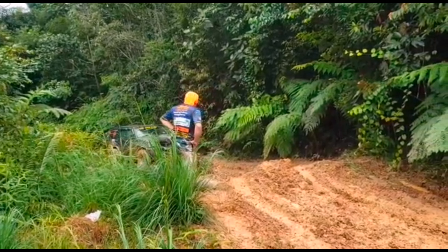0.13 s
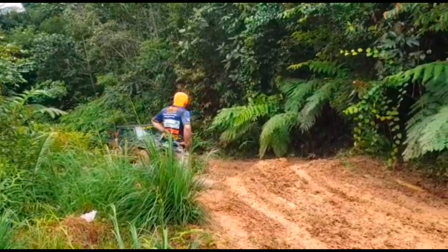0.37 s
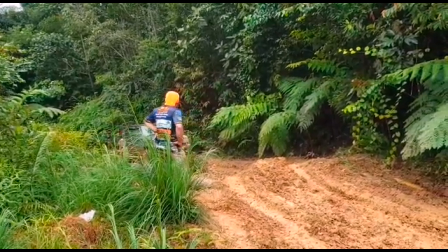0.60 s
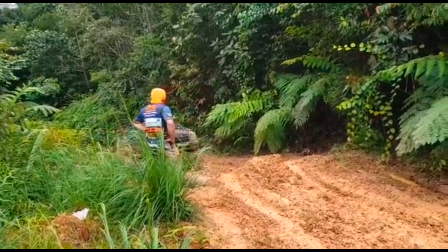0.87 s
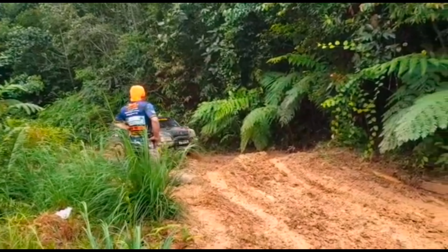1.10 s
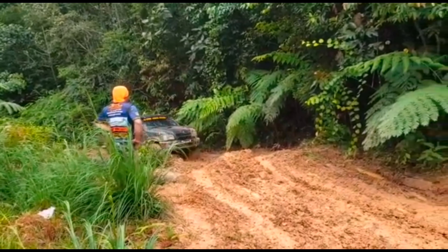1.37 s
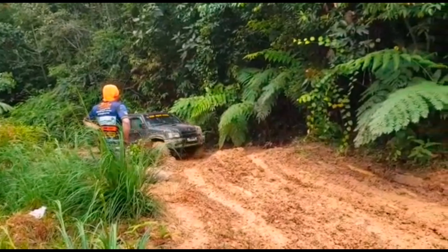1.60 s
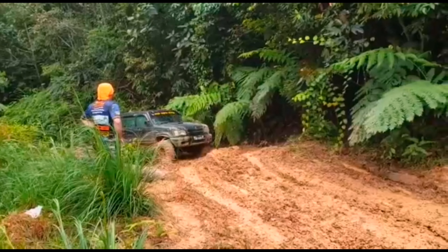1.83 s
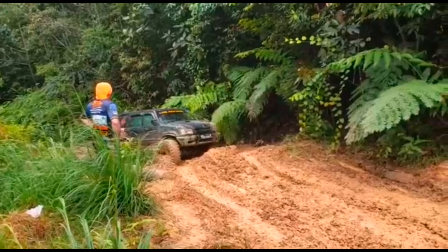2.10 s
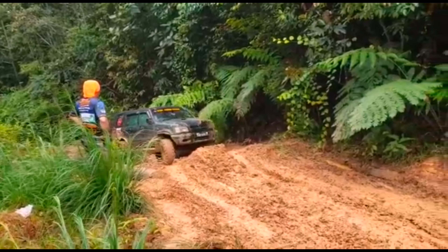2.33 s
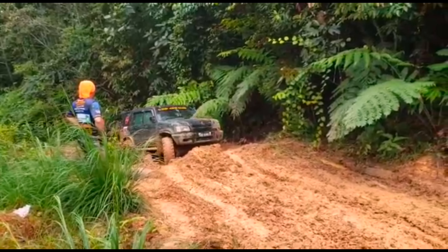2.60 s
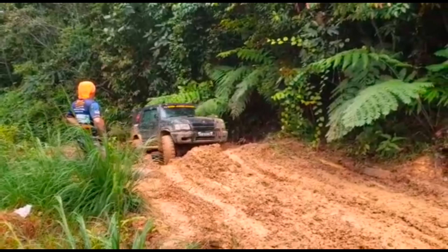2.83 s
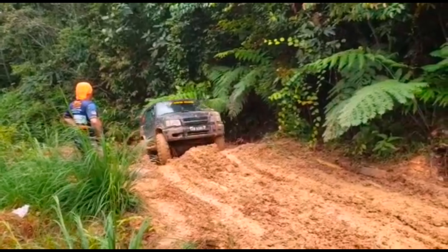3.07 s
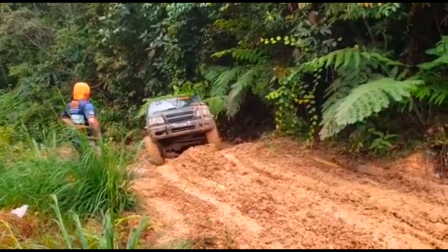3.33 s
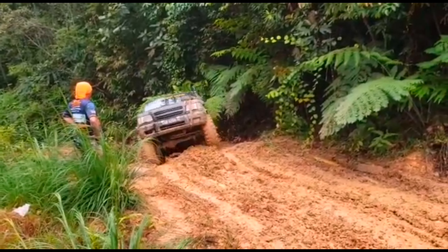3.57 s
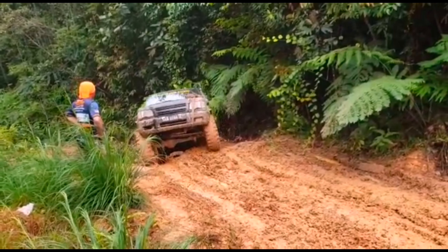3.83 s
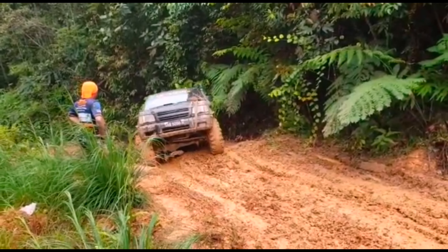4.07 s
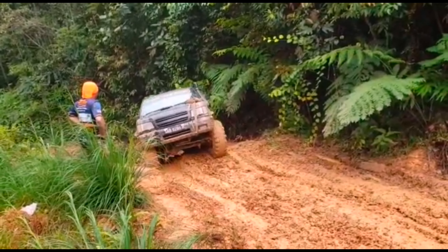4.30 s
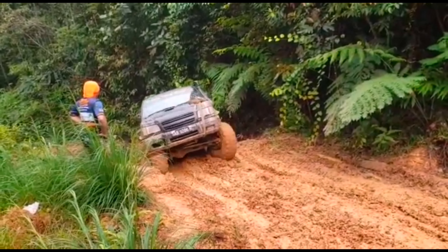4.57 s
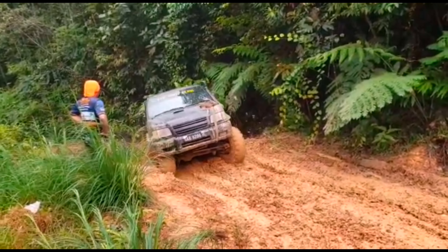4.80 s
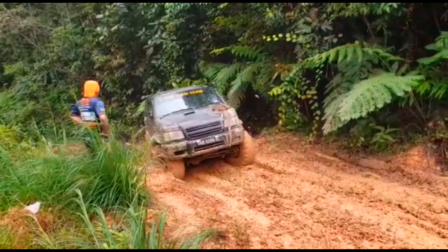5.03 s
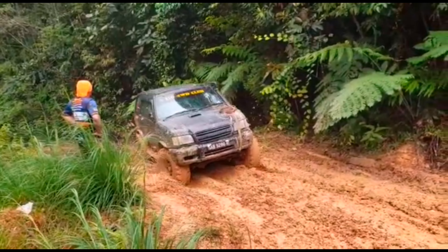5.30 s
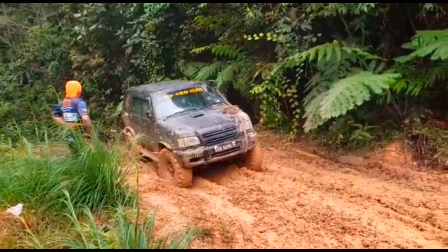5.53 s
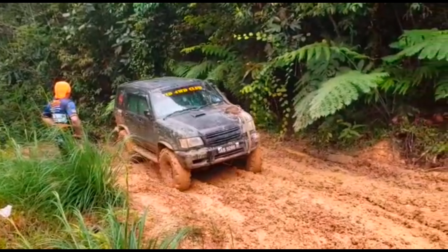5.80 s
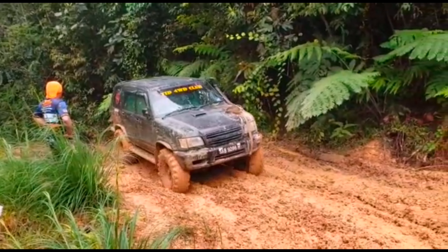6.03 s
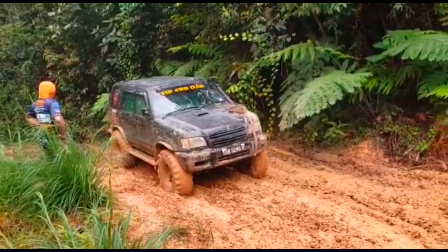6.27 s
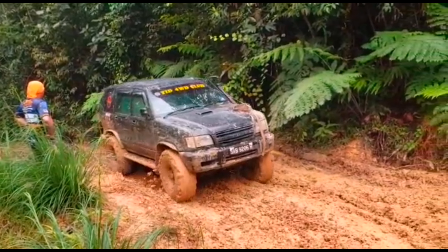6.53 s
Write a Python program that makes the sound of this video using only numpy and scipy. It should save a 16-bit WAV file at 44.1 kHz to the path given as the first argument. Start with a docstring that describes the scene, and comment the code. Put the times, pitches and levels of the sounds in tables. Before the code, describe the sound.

Outdoors among trees, a diesel off-roader approaches in uneven bursts of throttle: deep exhaust drone, gritty combustion knock, metallic clatter and airy hiss. An early surge fades, a distant engine hums briefly, then a long rising pull with one tiny bodywork scrape. A wheel-spinning peak collapses into a short lull before a low, chugging growl. Stereo pickup, fairly close, lightly reflected, no voices.

```python
"""A four-cylinder diesel off-roader climbs a muddy forest track towards the listener in surges of throttle.
Its exhaust is a sum of multiples of the firing rate; each firing also gates bands of noise as knock
through block and bodywork and sets panels ringing. Intake and fan hiss, tyres and frame rumble.
A second engine revs briefly further off, and something scrapes the bodywork once.
Two close microphone ports, with echoes off bank and trunks around."""
import sys
import numpy as np
from scipy import signal
from scipy.fft import rfft, irfft, next_fast_len
from scipy.io import wavfile
from scipy.ndimage import uniform_filter1d

SR = 44100
rng = np.random.default_rng(int(sys.argv[2]) if len(sys.argv) > 2 else 0)


def log_audio(samples):
    """Write samples as a 16-bit WAV file to the path given in sys.argv[1]."""
    # one column per channel
    frames = np.atleast_2d(samples).T
    # limit to full scale, then quantise
    limited = np.clip(frames, -1, 1)
    pcm = np.round(limited * 32767).astype(np.int16)
    wavfile.write(sys.argv[1], SR, pcm)


def gain_from_db(level_db):
    """Convert decibel levels to linear amplitude factors (20 dB per decade)."""
    decades = np.asarray(level_db, float) / 20
    return 10 ** decades


N = 293265
TIME_S = np.arange(N) / SR
MIDWAY_S = 3.3  # the approach is reckoned from here
PULLING_DB = -18  # pulse strength at full load

# Throttle as heard in the exhaust. Each row: time in seconds, pulse strength in dB,
# pulse sharpness in dB per order.
EXHAUST = [(0.0, -24.8, -0.2), (0.3, -16, 0), (1.0, -26.3, -1), (1.1, -24, -2.6), (1.18, -27, -1),
           (1.25, -36.5, 0.7), (1.6, -28.5, -2), (1.7, -29, -4.5), (1.9, -25, -6), (2.1, -24, -6),
           (2.15, -15.5, -3), (2.24, -17.5, -1.5), (2.5, -16, -2), (2.8, -16.5, -1.8), (3.1, -20, -1.9),
           (3.5, -18, -2), (3.6, -21.5, -1.5), (3.75, -42.5, 7), (3.8, -32, -4), (3.95, -32, 1),
           (4.15, -34, 1), (4.2, -19, 1.0), (4.3, -15.5, -2.5), (4.45, -14, -1), (4.6, -12.5, -2),
           (4.72, -16, -1.5), (4.9, -19.0, -0.3), (5.1, -18, -1), (5.2, -23.5, -4.5), (5.27, -28, 0.5),
           (5.33, -41.5, -11), (5.43, -50, -19.5), (5.55, -32.5, -2), (5.7, -16.5, -4.8),
           (6.1, -12.5, -2.5), (6.33, -13, -4), (6.45, -17, -3), (6.5, -13, -3.5), (6.65, -16.5, -3)]
# Lean of the sound between the ports. Each row: frequency in Hz, left minus right in dB.
LEANING = [(60, -2), (110, 2), (200, 2), (380, 1.5), (700, 1.5), (1290, 5), (2380, 1.5), (4400, -2.5),
           (8120, 0.0), (15000, -8)]
# How a noise follows the engine: level in dB at usual effort and speed, share of the effort swing (ratio),
# dB per octave of speed, dB per second of approach, share of brightness (ratio), share of pulse swing (ratio).
ROAR_LAW = (-42.5, 0.5, 2.5, 1.22, -.8, .08)


def in_time(rows):
    """Columns of a table after the time column, one value per sample."""
    s, *columns = np.transpose(rows)
    return [np.interp(TIME_S, s, c) for c in columns]


def at_hz(points, hz):
    """A spectrum read on a log-frequency axis, holding its end values beyond its ends."""
    f, v = np.transpose(points)
    return np.interp(np.log(hz), np.log(np.maximum(f, 1)), v)


def lean_gain(hz):
    """Left and right gain of a sound at this frequency."""
    return gain_from_db(at_hz(LEANING, hz) / 2 * np.array([[1], [-1]]))


def drift(rate_hz):
    """Slow random wander of spread 1: low-passed noise."""
    steps_per_s = 200
    steps = rng.standard_normal(int(N / SR * steps_per_s) + 2)
    r = np.exp(-2 * np.pi * rate_hz / steps_per_s)
    slow = signal.lfilter([1], [1, -r], steps)
    return np.interp(TIME_S * steps_per_s, np.arange(len(slow)), slow / slow.std())


def coloured(spectrum, gate, per_octave, patchy_db):
    """Gated stereo noise through a bank of band-passes whose levels wander separately; overall rms 1."""
    # Likeness of the two ports. Each row: frequency in Hz, left-right likeness 0-1.
    likeness = [(60, .97), (300, .95), (700, .9), (1400, .62), (3000, .55), (7000, .35), (15000, .25)]
    low, high = spectrum[0][0], spectrum[-1][0]
    edges = np.geomspace(low, high, int(per_octave * np.log2(high / low)) + 2)
    white = rng.standard_normal((2, 2, N)) * gate
    out = 0
    for k, band in enumerate(zip(edges, edges[1:])):
        band_pass = signal.butter(2, band, "band", fs=SR, output="sos")
        mid, side = signal.sosfilt(band_pass, white[k % 2])  # neighbouring bands use separate noise
        hz = np.sqrt(band[0] * band[1])
        alike = np.clip(at_hz(likeness, hz), 0, 1)
        gain = gain_from_db(at_hz(spectrum, hz) + patchy_db * drift(5.5))
        stereo = np.sqrt(1 + alike) * mid + np.sqrt(1 - alike) * side * [[1], [-1]]
        out = out + gain * lean_gain(hz) * stereo
    return out / out.std()


def load():
    """Engine load 0-1, from the strength of the exhaust pulses."""
    coasting_db = -28
    return np.clip((in_time(EXHAUST)[0] - coasting_db) / (PULLING_DB - coasting_db), 0, 1)


def order_levels(per_s):
    """Level of orders 1-5: pulse strength and sharpness, coloured by the silencer at each order's pitch."""
    # What the exhaust system lets through. Each row: frequency in Hz, gain in dB.
    silencer = [(38, -20), (50, -13), (62, -2.5), (80, -5.5), (100, -5.5), (120, -0.5), (145, 0.25),
                (165, -1.5), (190, -5.5), (215, -8.6), (245, -15.5), (290, -26), (350, -23.5), (400, -20.2),
                (450, -22.5), (560, -60)]
    steepen = 0.25  # strong pulses steepen: extra dB per dB of strength, per order above the third
    upper_hz, upper_nearing_db = 324, 7  # orders above this pitch grow on approach (dB per s per octave)
    pulse_db, sharp_db = in_time(EXHAUST)
    nearing_db = upper_nearing_db * (TIME_S - MIDWAY_S)
    levels = []
    for k in range(1, 6):
        order_db = pulse_db + sharp_db * (k - 2)
        steep_db = steepen * max(k - 3, 0) * (pulse_db - PULLING_DB)
        upper_db = nearing_db * np.maximum(np.log2(k * per_s / upper_hz), 0)
        levels.append(order_db + steep_db + at_hz(silencer, k * per_s) + upper_db)
    return levels


def orders(turns, levels_db):
    """Clean multiples of the firing rate, in step like a pressure pulse."""
    return sum(np.sqrt(2) * gain_from_db(db) * np.cos(2 * np.pi * (k + 1) * turns) for k, db in enumerate(levels_db))


def muffler(x):
    """The silencer spreads each pulse in time: an all-pass around its chamber resonance."""
    chamber_hz, width_hz = 46, 33
    r, c = np.exp(-np.pi * width_hz / SR), np.cos(2 * np.pi * chamber_hz / SR)
    return signal.lfilter([r * r, -2 * r * c, 1], [1, -2 * r * c, r * r], x)


def exhaust(turns, levels_db):
    """Each firing is a little stronger or weaker, by cylinder and by chance; the pulses arrive as suction."""
    # Strength of each cylinder in turn, in dB per dB of unevenness.
    cylinders_db = [-0.31, 0.41, 0.34, 0.48]
    # Cylinder unevenness, rising while the wheels spin. Each row: time in seconds, unevenness in dB.
    uneven = [(0, .55), (3.6, .75), (4.5, 2.2), (5.1, 2.2), (5.5, .75), (6.65, .6)]
    uneven_db, = in_time(uneven)
    firing = np.arange(int(turns[-1]) + 2)
    strength = np.take(cylinders_db, firing % 4)
    by_cylinder = uneven_db * np.interp(turns, firing, strength)
    by_chance = 0.68 * np.interp(turns, firing, rng.standard_normal(len(firing)))
    # timing shifts in firing intervals: strong pulses outrun weak ones, and chance scatter
    sooner = 0.016 * uneven_db * np.interp(turns - 0.5, firing, strength)
    scatter = 0.013 * uneven_db * np.interp(turns, firing, rng.standard_normal(len(firing)))
    return muffler(-orders(turns + sooner + scatter, levels_db) * gain_from_db(by_cylinder + by_chance))


def knock_sizes(knock, spread_db):
    """Strength of each firing's knock: chance, and some firings of set strength, most of them harder."""
    # Knocks of set strength. Each row: time in seconds, level in dB over a usual knock.
    hard_knocks = [(1.894, 4), (2.2, 3), (2.254, 2.5), (2.318, 3.5), (2.46, -1), (4.6, 1), (5.683, -0.5),
                   (5.786, 2.5), (5.833, 1), (5.878, 4.5), (5.942, 1), (6.006, 1), (6.13, 3), (6.248, 0),
                   (6.602, 1)]
    size_db = spread_db * rng.standard_normal(int(knock[-1]) + 2)
    for s, db in hard_knocks:
        size_db[int(knock[int(s * SR)])] = db
    return gain_from_db(size_db)[knock.astype(int)]


def knock_share(per_s):
    """Knock stands out at low speed and under load."""
    # Relative share of the noise that comes as knock at full load. Each row: firings per second, share 0-1.
    full_load = [(45, .85), (60, .82), (70, .62), (80, .48), (90, .2), (110, .2)]
    coasting_share = 0.45  # part of it left without load
    return np.interp(per_s, *np.transpose(full_load)) * (coasting_share + (1 - coasting_share) * load())


def bursts(knock, size, per_s, share, rise_s, decay_s):
    """Envelope of combustion knock: a quick rise at each firing, then a short fade, over a steady part."""
    since = knock % 1 / per_s
    shape = (1 - np.exp(-since / rise_s)) * np.exp(-since / decay_s)
    shape /= np.sqrt(uniform_filter1d(shape ** 2, size=SR // 5))
    share = np.clip(share, 0, 1)
    return np.sqrt(1 - share + share * (size * shape) ** 2)


def noise_level(law, per_s):
    """Level in dB of one noise layer from effort, speed, approach, brightness and throttle."""
    # Effort of the engine. Each row: time in seconds, mechanical noise in dB, brightness in dB
    # as the nose turns to or from the listener.
    effort = [(0, -46.5, -0.5), (.2, -37.5, 0), (.45, -39.5, 0), (.7, -40.5, 1), (1.0, -44.5, -0.5),
              (1.31, -48, -1), (1.7, -48.5, -1.5), (2.07, -47, -4.5), (2.24, -39.5, -2), (2.5, -39, 0.5),
              (2.8, -41.5, .5), (3.06, -38.5, .5), (3.39, -42.5, -.5), (3.59, -39.5, 0), (3.76, -44, -.5),
              (4.09, -43.5, -2), (4.39, -35.5, -1), (4.65, -37, -1), (5.13, -41, -.5), (5.54, -49, 1),
              (5.65, -46.5, -1), (5.78, -40.5, -1.5), (6.12, -37, 1), (6.44, -41, -1), (6.65, -37, 1.5)]
    usual_db, usual_per_s = -42, 70
    effort_db, bright_db = in_time(effort)
    db, follows, octave_db, nearing_db, bright, pulsed = law
    engine_db = follows * (effort_db - usual_db) + octave_db * np.log2(per_s / usual_per_s)
    place_db = bright * bright_db + nearing_db * (TIME_S - MIDWAY_S)
    return db + engine_db + place_db + pulsed * (in_time(EXHAUST)[0] - PULLING_DB)


def boom(per_s, soft):
    """Low, hollow knock noise whose bands wander widely under the soft firing envelope."""
    # Each row: frequency in Hz, relative level in dB per Hz.
    spectrum = [(280, -15.5), (340, -5), (390, 2.5), (450, -5.5)]
    # Columns and units as in ROAR_LAW.
    law = (-45.5, 1.54, 4, 1.8, -1.2, -0.17)
    return gain_from_db(noise_level(law, per_s)) * coloured(spectrum, soft, per_octave=5, patchy_db=5.0)


def roar(per_s, soft):
    """Low-mid knock noise, pulsing softly with the firings."""
    # Each row: frequency in Hz, relative level in dB per Hz.
    spectrum = [(460, -4.5), (550, -3.5), (620, -3), (690, -8)]
    return gain_from_db(noise_level(ROAR_LAW, per_s)) * coloured(spectrum, soft, per_octave=5, patchy_db=1.5)


def rasp(per_s, soft):
    """Rough mid-range knock noise, pulsing softly with the firings."""
    # Each row: frequency in Hz, relative level in dB per Hz.
    spectrum = [(720, -2), (850, -0.5), (960, -1.5), (1150, -4), (1280, -9), (1550, -3)]
    # Columns and units as in ROAR_LAW.
    law = (-41.5, 0.97, 1.6, .66, -.8, -0.09)
    return gain_from_db(noise_level(law, per_s)) * coloured(spectrum, soft, per_octave=6, patchy_db=1.5)


def clatter(per_s, sharp):
    """Hard upper-mid knock noise under the sharp firing envelope."""
    # Each row: frequency in Hz, relative level in dB per Hz.
    spectrum = [(1500, -10), (1900, -1.5), (2500, -1), (3100, -2.5), (3600, -6), (4300, -4.5)]
    # Columns and units as in ROAR_LAW.
    law = (-40, 0.81, 0.2, -0.08, 0, 0.0657)
    return gain_from_db(noise_level(law, per_s)) * coloured(spectrum, sharp, per_octave=4, patchy_db=1.5)


def ticking(per_s, sharp):
    """Treble ticks at the firings over a steady bed of noise."""
    # Each row: frequency in Hz, relative level in dB per Hz.
    spectrum = [(4200, -6), (5000, -7.5), (6300, -5.5), (7200, -10), (8800, -16.5)]
    # Columns and units as in ROAR_LAW.
    law = (-42.5, 0.73, 1.7, 0.04, .8, 0.18)
    gate = 0.34 + 0.58 * sharp
    return gain_from_db(noise_level(law, per_s)) * coloured(spectrum, gate, per_octave=4, patchy_db=1.23)


def boost(per_s):
    """The turbocharger spools up under load: extra intake hiss (dB), lagging behind load and speed."""
    from_per_s, lag_s, octave_db = 71, 0.15, 15  # dB per octave of speed at full load
    r = np.exp(-1 / (lag_s * SR))
    spooling = load() * np.maximum(np.log2(per_s / from_per_s), 0)
    return octave_db * signal.lfilter([1 - r], [1, -r], spooling)


def hiss(per_s, sharp):
    """Air noise of intake and fan, partly pulsed by the firings and raised by the boost."""
    # Each row: frequency in Hz, relative level in dB per Hz.
    spectrum = [(8300, -25), (9400, 0.5), (10500, 3), (11900, 6), (13300, 0), (15700, -6)]
    # Columns and units as in ROAR_LAW.
    law = (-49.5, 0.37, 3.5, 0.84, .6, 0)
    gate = 0.5 + 0.45 * sharp
    level_db = noise_level(law, per_s) + boost(per_s)
    return gain_from_db(level_db) * coloured(spectrum, gate, per_octave=6, patchy_db=1.0)


def rumble(per_s):
    """Tyres, frame and ground: ungated low noise that follows half the roar's level in dB."""
    # Each row: frequency in Hz, relative level in dB per Hz.
    spectrum = [(38, 3), (70, 7.5), (150, 11.5), (230, 4.5), (300, -17)]
    level_db = 0.5 * noise_level(ROAR_LAW, per_s) - 15.5
    return gain_from_db(level_db) * coloured(spectrum, 1, per_octave=1.5, patchy_db=5.0)


def panels(knock, size, per_s, spread_db):
    """Every firing shakes each mode briefly, with a strength of its own on either side; rms 1."""
    # Panels and pipes that ring. Each row: frequency in Hz, relative level in dB, 60 dB decay time in seconds,
    # dB per second as the vehicle turns its front to the listener.
    modes = [(394.3, -1, 0.05, 1.4), (536, 0.5, 0.045, -1.7), (825, 6, 0.033, 2.8), (897, -2, 0.038, 4.7),
             (1267, -6.5, 0.061, 0.7), (1870, -22, 0.057, 6), (2153, -16, 0.033, -2),
             (2460, -9, .025, -2.5), (2930, -12, 0.023, -6)]
    buzz_per_s, buzz_width_per_s = 62, 6.0  # thin panels buzz near one engine speed, under load
    buzz_db, buzz_above_hz = 13.0, 2000
    strike_s = 0.0025  # time constant of the shake
    hits = np.flatnonzero(np.diff(knock.astype(int))) + 1
    near_speed = np.exp(-((per_s[hits] - buzz_per_s) / buzz_width_per_s) ** 2)
    loaded_buzz_db = buzz_db * near_speed * load()[hits]
    hold, out = np.exp(-1 / (strike_s * SR)), np.zeros((2, N))
    for hz, db, t60, turning_db in modes:
        shared, left, right = rng.standard_normal((len(hits), 3)).T
        mode_db = db + turning_db * (hits / SR - MIDWAY_S) + loaded_buzz_db * (hz > buzz_above_hz)
        chance_db = spread_db * (shared + 0.44 * np.array([left, right]))
        clicks = np.full((2, N), 1e-18)
        clicks[:, hits] = size[hits] * gain_from_db(mode_db + chance_db)
        shake = signal.lfilter([1], [1, -2 * hold, hold ** 2], clicks) * rng.standard_normal(N)
        r, w = gain_from_db(-60 / (t60 * SR)), 2 * np.pi * hz / SR
        out += lean_gain(hz) * signal.lfilter([1, 0, -1], [1, -2 * r * np.cos(w), r * r], shake)
    return out / out.std()


def ringing(knock, size, per_s):
    """Ringing panels and pipes at a level that follows effort, speed and throttle."""
    # Columns and units as in ROAR_LAW.
    law = (-41.5, 0.54, 1.8, -0.78, -1.2, 1)
    return gain_from_db(noise_level(law, per_s)) * panels(knock, size, per_s, spread_db=1.0)


def tailpipe(x):
    """Sound runs to and fro in the pipe: resonances at multiples of its pitch, fading in the treble."""
    # The tailpipe swings out of sight. Each row: time in seconds, share heard through the pipe 0-1.
    pipe_heard = [(0, 0.36), (3.2, 0.97), (4.6, 0.4), (6.65, .3)]
    pipe_hz, pipe_return, fade_hz = 428, 0.4, 3500
    size = next_fast_len(N + SR // 10)
    hz = np.arange(size // 2 + 1) * SR / size
    back = pipe_return / (1 + (hz / fade_hz) ** 4) * np.exp(-2j * np.pi * hz / pipe_hz)
    response = np.sqrt(1 - abs(back) ** 2) / (1 - back)
    resonant = irfft(rfft(x, size) * response, size)[:, :N]
    heard = np.clip(in_time(pipe_heard)[0], 0, 1)
    return heard * resonant + (1 - heard) * x


def ground_dip(x):
    """The echo off the track cancels a band, by a depth that varies along the climb."""
    # Each row: time in seconds, depth of the dip 0-1.
    dip = [(0, 0.7), (1.5, 0.25), (2.2, 1), (2.7, 0.5), (3.3, 0), (5.3, 0.12), (6.0, 0.7), (6.65, 0)]
    dip_hz, width_hz = 675, 150
    depth, = in_time(dip)
    r, c = np.exp(-np.pi * width_hz / SR), np.cos(2 * np.pi * dip_hz / SR)
    band = signal.lfilter((1 - r * r) / 2 * np.array([1, 0, -1]), [1, -2 * r * c, r * r], x)
    return x - np.clip(depth, 0, 1) * band


def trees(x, db):
    """A few dull echoes off bank and trunks, other ones on each side, weaker the later they come."""
    dull = signal.lfilter([0.15], [1, -0.85], x)
    out = np.zeros((2, N))
    lags = (rng.uniform(0.0083, 0.083, 8) * SR).astype(int)
    for k, lag in enumerate(lags):
        out[k % 2, lag:] += gain_from_db(db - 60 * lag / SR) * dull[:-lag]
    return out


def far_engine():
    """Another exhaust further off, heard only by its lowest orders, its level wandering."""
    # Second engine. Each row: time in seconds, firings per second, level in dB.
    revs = [(0.7, 31.5, -64), (0.9, 35.5, -44), (1.1, 35.2, -41), (1.3, 41, -38), (1.5, 43.5, -29.5),
            (1.62, 46.3, -39.5), (1.73, 44, -35), (1.85, 40, -61), (2.0, 26, -60), (2.15, 42, -53)]
    # Relative level of orders 1-5, in dB.
    orders_db = [-11, -0.5, 2.5, -17, -21]
    per_s, db = in_time(revs)
    heard = (TIME_S > revs[0][0]) & (TIME_S < revs[-1][0])
    return heard * gain_from_db(db + 1.7 * drift(6.5)) * orders(np.cumsum(per_s) / SR, orders_db)


def bite():
    """The noise sinks just before the throttle bites, then jolts and settles (dB)."""
    # Times when the throttle bites, in seconds.
    bites_s = [2.13, 5.67]
    lull_db, lull_s = -2.0, 0.05
    jolt_db, fade_s = 3.0, 0.05
    since = TIME_S - np.array(bites_s)[:, None]
    lull = lull_db * np.exp(-abs(since) / lull_s)
    jolt = jolt_db * np.exp(-abs(since) / fade_s)
    return np.where(since < 0, lull, jolt).sum(axis=0)


def scrape(jolts):
    """Something drags briefly along the bodywork: a short bright rasp, jolted by the firings."""
    peak_s, peak_db = 3.085, -33
    rise_db_per_s, fall_db_per_s = 170, 170
    since = TIME_S - peak_s
    db = peak_db - np.maximum(-rise_db_per_s * since, fall_db_per_s * since)
    spectrum = [(2900, -1), (3400, 0), (4300, -4)]  # Hz, relative dB per Hz
    return gain_from_db(db) * coloured(spectrum, jolts, per_octave=3, patchy_db=0.5)


def scene():
    """Exhaust, knock and hiss of the climbing vehicle with the far engine."""
    # Engine speed. Each row: time in seconds, firings per second.
    speed = [(0.0, 63.87), (0.3, 70.16), (0.75, 83.06), (0.89, 78.93), (1.09, 75.3), (1.31, 63.94),
             (1.8, 57.08), (2.05, 54.52), (2.18, 56.94), (2.5, 66.17), (2.56, 65.94), (2.85, 69.84),
             (3.41, 82.05), (3.62, 88.76), (3.8, 82.72), (4.11, 88.12), (4.22, 95.12), (4.42, 113.94),
             (4.7, 92.84), (5.11, 84.04), (5.2, 81.34), (5.59, 37.13), (5.95, 46.76), (6.1, 49.71),
             (6.45, 49.73), (6.65, 53.77)]
    per_s, = in_time(speed)
    turns = 0.27 + np.cumsum(per_s) / SR  # firing intervals gone
    knock = turns + 0.2  # knock leads the exhaust pulse by this part of an interval
    size = knock_sizes(knock, spread_db=2.0)
    sharp_size = knock_sizes(knock, spread_db=2.0)
    share, bite_gain = knock_share(per_s), gain_from_db(bite())
    soft = bite_gain * bursts(knock, size, per_s, 0.66 * share, rise_s=0.00016, decay_s=0.0098)
    sharp = bite_gain * bursts(knock, sharp_size, per_s, 0.95 * share, rise_s=0.0015, decay_s=0.0065)

    note = exhaust(turns, order_levels(per_s)) + far_engine()
    direct_note = note * gain_from_db([[0.45], [-0.45]])  # leans slightly left
    piped = tailpipe(rasp(per_s, soft) + clatter(per_s, sharp))
    over_ground = ground_dip(boom(per_s, soft) + roar(per_s, soft) + piped)
    treble = ticking(per_s, sharp) + hiss(per_s, sharp)
    body = ringing(knock, size, per_s) + rumble(per_s) + scrape(sharp ** 2)
    return direct_note + trees(note, -22.5) + over_ground + treble + body


def band_limit(x):
    """A steep low-pass at the top of the band."""
    return signal.sosfilt(signal.butter(12, 15730, fs=SR, output="sos"), x)


def record(dry):
    """The right port hears everything a few samples later, less so while the vehicle faces the ports."""
    # The vehicle crosses in front. Each row: time in seconds, lag of the right port in seconds.
    port_lag = [(0, .000098), (3.2, .000098), (4.6, .00003), (5.3, .00003), (5.7, .00009), (6.65, .000098)]
    lag_s, = in_time(port_lag)
    later = np.interp(np.arange(N) - lag_s * SR, np.arange(N), dry[1])
    return band_limit(np.array([dry[0], later]))


dry = scene()
out = record(dry)
log_audio(out)
```